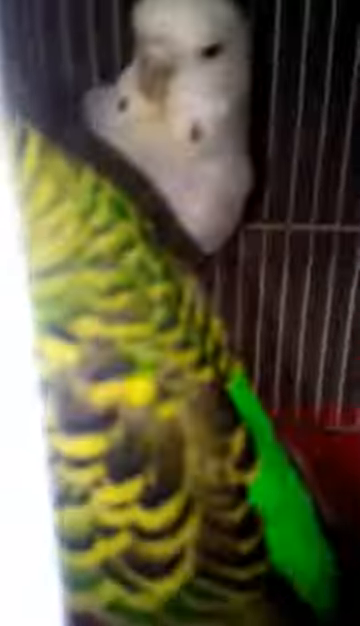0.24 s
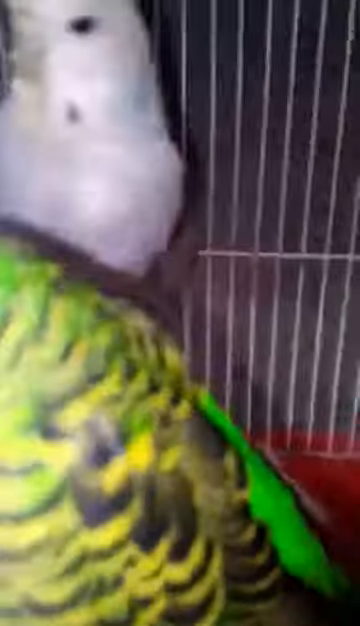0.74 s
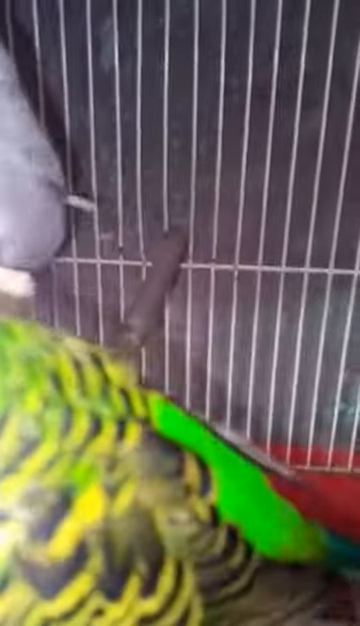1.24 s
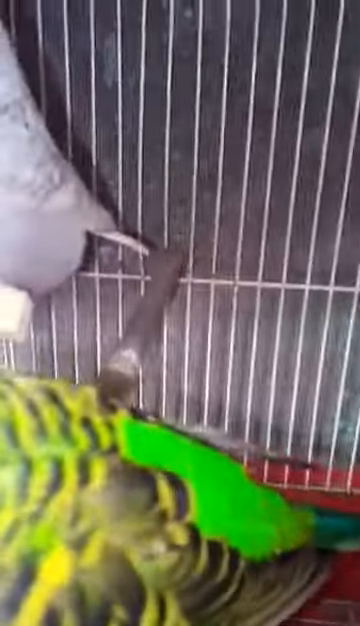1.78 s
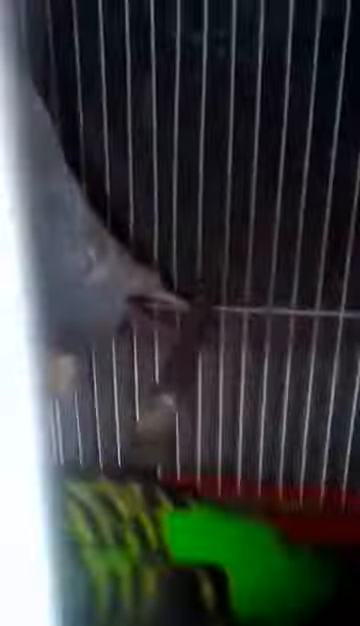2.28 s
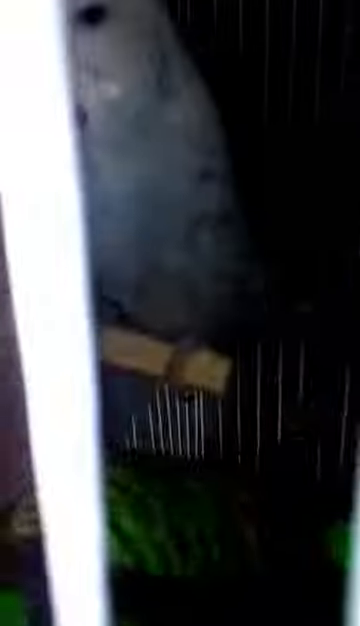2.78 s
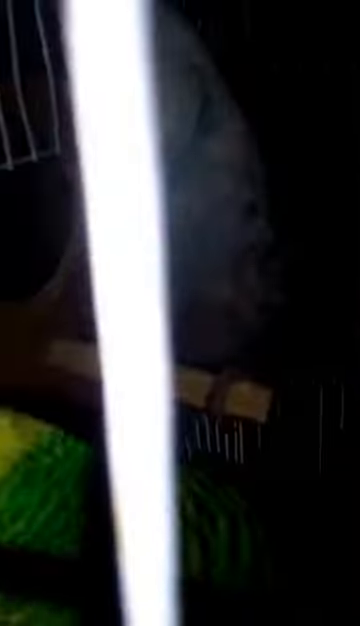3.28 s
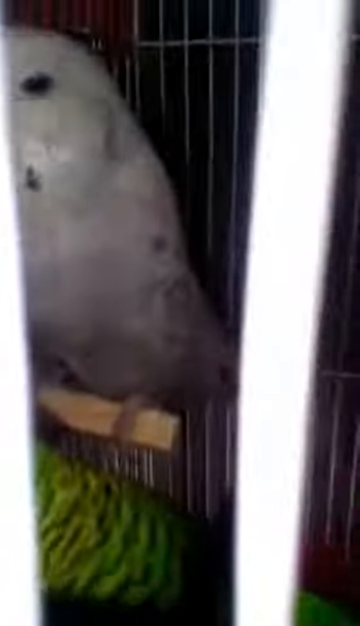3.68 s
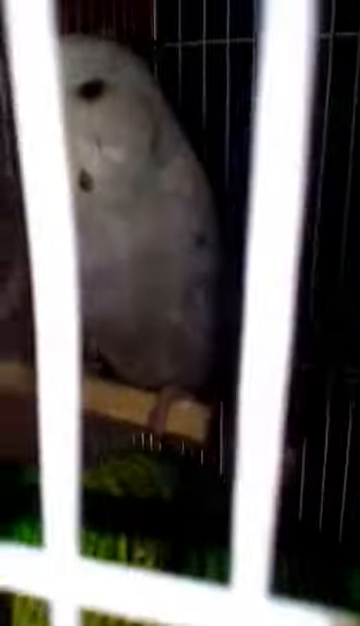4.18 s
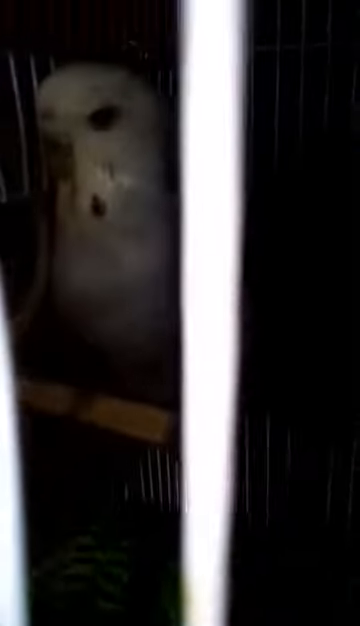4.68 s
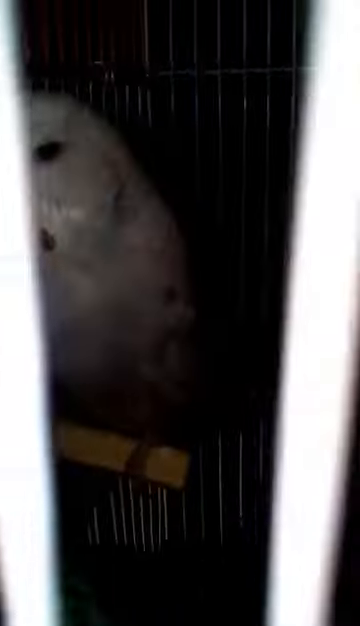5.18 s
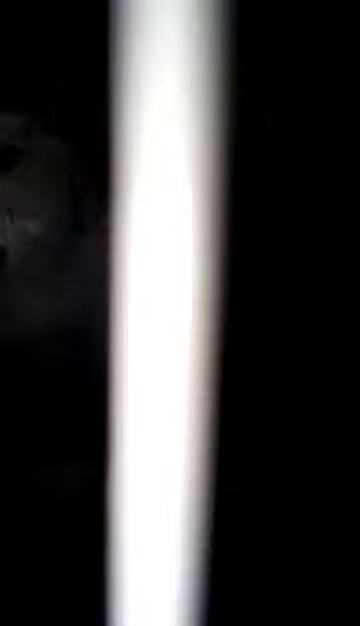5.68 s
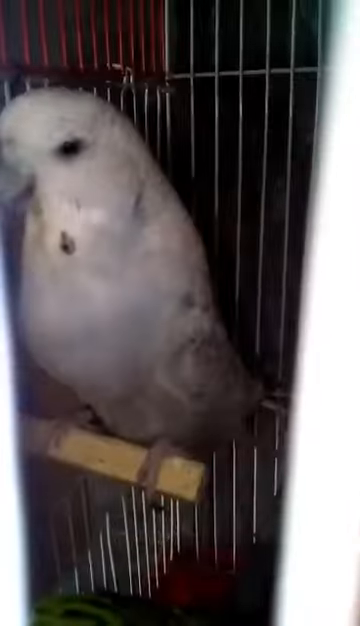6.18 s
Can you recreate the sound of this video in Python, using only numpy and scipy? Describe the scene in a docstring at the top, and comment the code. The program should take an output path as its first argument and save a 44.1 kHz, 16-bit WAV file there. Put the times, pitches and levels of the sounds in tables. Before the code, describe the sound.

Caged budgerigars beg in a bare, reverberant room. Loud fluttering squeaks and hissing rasps come at once with knocks on wood, then in further bursts until nearly three seconds. A quieter stretch holds only rustling bedding, faint squeaks and a knock. Raspy calls return near five seconds, followed by clear close chirps and two small clucks. The close handheld microphone picks up low handling rumbles.

```python
"""Begging budgerigar chicks

Budgerigar chicks beg in bursts of harsh hisses and squeaky notes, in a cage in a bare, echoing room.
Hisses are resonated air puffs; squeaks, peeps and chirps are gliding, fluttering partials.
Birds shuffle in the bedding (grains, ringing walls), knock on the wooden nest box (decaying modes)
and tick on the wires; a few clear chirps and two clucks follow near the end. Low noise rumbles as the
camera is handled, and gain control ducks the background along with the loudest calls."""
import sys
import numpy as np
from scipy import signal
from scipy.fft import rfft, irfft
from scipy.io import wavfile
from scipy.ndimage import uniform_filter1d

SR = 44100
rng = np.random.default_rng(int(sys.argv[2]) if len(sys.argv) > 2 else 0)


def generate_wav(signal):
    """Clip the signal to [-1, 1] and save it as 16-bit WAV at the path in sys.argv[1]."""
    frames = np.transpose(np.atleast_2d(signal))
    scaled = np.clip(frames, -1, 1) * 32767
    pcm = np.round(scaled).astype(np.int16)
    wavfile.write(sys.argv[1], SR, pcm)


N = 284004
TIME = np.arange(N) / SR


def from_db(db):
    """Amplitude ratio: 20 dB is a factor of ten."""
    return 10 ** (np.asarray(db) / 20)


def rms_one(x):
    """Normalisation: scale to unit root-mean-square."""
    return x / np.sqrt(np.mean(x ** 2) + 1e-20)


def add(track, start_s, sound):
    """Superposition: mix a sound into a track at a time."""
    at = max(round(start_s * SR), 0)
    track[at:at + len(sound)] += sound[:max(N - at, 0)]


def noise(size):
    """White noise: independent Gaussian samples."""
    return rng.standard_normal(size)


def low_pass(x, hz):
    """Second-order low-pass filtering."""
    return signal.sosfilt(signal.butter(2, min(hz, .45 * SR), fs=SR, output="sos"), x)


def coloured(x, spectrum):
    """Spectral shaping by a (freq_hz, gain_db) curve, interpolated over log frequency."""
    hz, db = np.transpose(spectrum)
    bins = np.maximum(np.fft.rfftfreq(len(x), 1 / SR), 1)
    gain = from_db(np.interp(np.log(bins), np.log(hz), db))
    return irfft(rfft(x) * gain, len(x))


def wander(size, rate_hz):
    """Random modulation: straight lines between Gaussian values drawn at a given rate."""
    steps = noise(size + 2)
    return np.interp(np.arange(size) * rate_hz / SR, np.arange(size + 2), steps)


def resonance(x, hz, width_hz):
    """Band-pass resonance with steep skirts; unit rms."""
    edges = np.clip([hz - width_hz / 2, hz + width_hz / 2], 100, .45 * SR)
    return rms_one(signal.sosfilt(signal.butter(2, edges, "band", fs=SR, output="sos"), x))


def swell(size, attack, release):
    """Amplitude envelope: rise and fall over these shares of the length."""
    u = np.linspace(0, 1, size)
    return np.sin(np.pi / 2 * np.clip(np.minimum(u / attack, (1 - u) / release), 0, 1))


def movement(rows, rest_db, attack, release):
    """Amplitude modulation: a gain that swells with each movement above a resting level."""
    gain = np.full(N, from_db(rest_db))
    for start_s, length_s, db in rows:
        add(gain, start_s, from_db(db) * swell(int(length_s * SR), attack, release))
    return gain


# background noise spectrum: freq_hz, gain_db
AIR_SPECTRUM = [(25, -16), (70, 9.5), (200, -25), (480, 5.5), (900, 0), (1500, 0), (2500, 2.5),
                (4500, -4.5), (7000, 5), (8500, -48), (14000, -47)]


def air(level_db=-51.5):
    """Stationary coloured noise: the steady background."""
    return from_db(level_db) * rms_one(coloured(noise(N), AIR_SPECTRUM))


def grains(rate_hz, size_db=2.0):
    """Shot noise: randomly timed impulses of random size and sign."""
    sizes = from_db(size_db * np.minimum(rng.exponential(1, N), 4)) * rng.choice([-1, 1], N)
    return sizes * (rng.random(N) < rate_hz / SR)


# birds shuffling in the nest: start_s, length_s, husk_level_db, patter_level_db
SHUFFLE_MOVES = [(0.04, 0.69, -38.5, -49.5), (0.88, 0.56, -55.5, -55), (1.347, 0.41, -43.5, -52),
                 (1.725, 0.61, -40.5, -52.5), (2.61, 0.47, -40.5, -54), (3.264, 0.33, -46, -54.5),
                 (3.539, 0.59, -48, -57), (4.685, 1, -41.5, -59.5), (5.645, 0.59, -51.5, -54.5)]
# spectrum of the crackling husks: freq_hz, gain_db
HUSK_SPECTRUM = [(200, -46), (500, -19.5), (1000, 3.5), (1600, 3), (2600, 9), (4200, 1.5), (6000, 2.5),
                 (7200, 10), (8300, -10.5), (10000, -6.5), (12000, -25), (14000, -22)]


def husks(grains_per_s=2500, clump_db=3.5, clump_rate_hz=45, rest_db=-56):
    """Granular friction: dense clicks of unequal size crackle in clumps."""
    start_s, length_s, husk_db, _ = np.transpose(SHUFFLE_MOVES)
    clumped = grains(grains_per_s) * from_db(clump_db * wander(N, clump_rate_hz))
    gain = movement(zip(start_s, length_s, husk_db), rest_db, attack=0.065, release=0.66)
    return rms_one(coloured(clumped, HUSK_SPECTRUM)) * gain


def ring(clicks, hz, t60_s):
    """Impulse response of a damped mode: a unit click starts a decaying sine of height 1."""
    r, w = from_db(-60 / (t60_s * SR)), 2 * np.pi * hz / SR
    return signal.lfilter([0, np.sin(w)], [1, -2 * r * np.cos(w), r * r], clicks + 1e-18)


# thin wall modes that feet set ringing: freq_hz, level_db
WALL_MODES = [(290, -3.5), (400, 3.5), (455, 3.5), (510, -1), (580, 6.5), (660, 3.5), (820, 7.5), (920, 2),
              (1060, 5.5), (1300, -1), (1520, 3.5), (1800, 2.5)]


def patter(steps_per_s=220, t60_s=0.08, rest_db=-61.5):
    """Modal excitation: each footfall rings one randomly chosen mode of the thin box walls."""
    start_s, length_s, _, patter_db = np.transpose(SHUFFLE_MOVES)
    steps, mode = grains(steps_per_s), rng.integers(0, len(WALL_MODES), N)
    walls = np.zeros(N)
    for k, (hz, db) in enumerate(WALL_MODES):
        walls += from_db(db) * ring(steps * (mode == k), hz, t60_s)
    gain = movement(zip(start_s, length_s, patter_db), rest_db, attack=0.084, release=0.39)
    return rms_one(walls) * gain


# low rumbles as the camera is handled: start_s, length_s, level_db
HANDLING_RUMBLES = [(0.66, 0.18, -47), (0.93, 0.25, -63.5), (1.72, 0.87, -53), (2.68, .32, -45.5),
                    (5.42, 0.25, -41), (5.95, 0.13, -47.5)]
# spectrum of the rumble: freq_hz, gain_db
RUMBLE_SPECTRUM = [(20, -47), (35, 0), (58, 2), (100, 3.5), (200, -7.5), (350, -10.5), (700, -13.5),
                   (2000, -72)]


def handling(lump_db=7.5, lump_rate_hz=30, rest_db=-63.5):
    """Low-frequency handling noise: the handled camera rumbles in uneven lumps."""
    lumps = noise(N) * from_db(lump_db * wander(N, lump_rate_hz))
    gain = movement(HANDLING_RUMBLES, rest_db, attack=0.066, release=0.83)
    return rms_one(coloured(lumps, RUMBLE_SPECTRUM)) * gain


def whistle(length_s, start_hz, end_hz, rough, octave_db, attack,
            flutter_rate_hz=1100, shimmer_db=5.0, third_db=-15, tremble=0.0085):
    """Chaotic frequency modulation: fluttering membranes smear a gliding tone's partials into a screech."""
    size = int((length_s + .004) * SR)  # each note sounds 4 ms longer than listed
    flutter = rough * wander(size, flutter_rate_hz) + tremble * wander(size, 156.8)
    pitch_hz = np.linspace(start_hz, end_hz, size) * (1 + flutter)
    phase = 2 * np.pi * np.cumsum(pitch_hz) / SR
    # the third partial is set relative to the octave, so both grow together
    overtones = np.sin(2 * phase) + from_db(third_db) * np.sin(3 * phase)
    shimmer = rms_one(from_db(shimmer_db * wander(size, 449)))
    pressure = swell(size, attack, 0.23) * shimmer
    return np.sqrt(2) * pressure * (np.sin(phase) + from_db(octave_db) * overtones)


# rough squeaks of the chicks: start_s, length_s, start_hz, end_hz, level_db, roughness (share of pitch)
SQUEAK_NOTES = [(0.002, .065, 2545, 2630, -36.5, 0.19), (0.069, 0.052, 2410, 2750, -27, 0.12),
                (0.091, 0.071, 4016, 3730, -23, 0.019), (0.163, 0.059, 2980, 3600, -9.5, 0.1),
                (0.229, 0.053, 4860, 4710, -26, 0.068), (0.364, 0.11, 4095, 3290, -18.5, 0.071),
                (0.424, 0.058, 2560, 1910, -24.5, .063), (0.486, 0.067, 2960, 3125, -22, 0.08),
                (0.704, 0.11, 2638, 2620, -21.5, 0.088), (0.717, 0.017, 1970, 1864, -28.5, 0.013),
                (0.742, 0.068, 3852, 3985, -10, 0.013), (0.794, 0.059, 3114, 3340, -8, 0.026),
                (0.829, 0.035, 3740, 3642, -9, 0.049), (1.43, 0.045, 2544, 2660, -36, 0.049),
                (1.519, 0.054, 4380, 4500, -25, 0.096), (1.554, 0.068, 2355, 1868, -27.5, 0.28),
                (1.578, 0.044, 3584, 3520, -11.5, 0.056), (1.638, 0.067, 3607, 3650, -11.5, 0.021),
                (3.577, 0.099, 2133, 2520, -39, 0.116), (3.709, 0.037, 2500, 2520, -37.5, 0.072),
                (3.781, 0.069, 2516, 2677, -35.5, 0.058), (3.963, 0.06, 1990, 2053, -42, 0.14),
                (4.016, 0.09, 2268, 2790, -39.5, 0.063), (4.106, 0.13, 2423, 2174, -43, 0.051),
                (4.77, 0.037, 2624, 2330, -28, 0.02), (4.851, 0.032, 2390, 2752, -29.5, 0.04),
                (4.931, 0.058, 2600, 2786, -30.5, 0.069), (4.989, 0.045, 3660, 4040, -25.5, 0.055),
                (5.242, .04, 3680, 3540, -28.5, 0.084)]


def squeaks(octave_db=-13):
    """Nonlinear phonation: each squeak has its own degree of chaotic pitch flutter."""
    out = np.zeros(N)
    for start_s, length_s, start_hz, end_hz, db, rough in SQUEAK_NOTES:
        note = whistle(length_s, start_hz, end_hz, rough, octave_db, attack=0.21)
        add(out, start_s, from_db(db) * note)
    return out


# peeps with a strong octave, some of them the voiced core of a rasp; level is that of the fundamental:
# start_s, length_s, start_hz, end_hz, level_db
PEEP_NOTES = [(0.33, .045, 2525, 3365, -33.5), (1.052, 0.17, 2780, 2720, -56),
              (2.119, 0.044, 3250, 3300, -26), (2.199, 0.075, 3070, 3267, -15),
              (2.444, 0.089, 3042, 3527, -20), (2.561, 0.098, 3042, 2780, -28),
              (3.232, 0.15, 2740, 2656, -51.5), (3.879, 0.046, 2570, 2500, -55),
              (4.396, 0.12, 2480, 2460, -60), (4.954, .05, 2815, 2760, -41.5),
              (5.021, 0.0534, 2896, 3010, -32)]


def peeps(octave_db=13, rough=0.0604):
    """Dominant second harmonic: the octave carries the note above a weaker fundamental."""
    out = np.zeros(N)
    for start_s, length_s, start_hz, end_hz, db in PEEP_NOTES:
        note = whistle(length_s, start_hz, end_hz, rough, octave_db, attack=0.33, third_db=-14)
        add(out, start_s, from_db(db) * note)
    return out


# knocks on the box: start_s, level_db, contact_hz (cut-off; a softer contact is lower)
BOX_KNOCKS = [(0.094, -7.5, 1420), (0.11, -14, 400), (0.244, -18, 162), (0.693, -35.5, 256),
              (1.501, -37.5, 250), (1.734, -38.5, 247), (1.948, -23.5, 198.5), (2.519, -11.5, 85),
              (2.732, -28.5, 190), (3.505, -33, 90), (4.0656, -20.5, 720), (5.451, -21, 326),
              (5.474, -21.5, 200)]
# modes of the box: freq_hz, level_db, t60_s
BOX_MODES = [(67, -30.5, 0.36), (109, -17, 0.085), (199, -13, 0.071), (271, -5.5, 0.036), (390, -16, 0.018),
             (510, 1.5, 0.028), (878, -2.5, 0.026)]


def knocks(rattle_db=-20, rattle_t60_s=0.19):
    """Modal impact: a bump rings the box and shakes what lies in it; soft contact leaves only the thud."""
    out, t = np.zeros(N), TIME[:SR // 3]
    body = np.zeros(len(t))
    for hz, db, t60_s in BOX_MODES:
        body += from_db(db - 60 * t / t60_s) * np.sin(2 * np.pi * hz * t)
    for start_s, db, contact_hz in BOX_KNOCKS:
        rattle = rms_one(low_pass(noise(len(t)), 470)) * from_db(rattle_db - 60 * t / rattle_t60_s)
        add(out, start_s, from_db(db) * low_pass(body + rattle, contact_hz))
    return out


# hissing begging rasps: start_s, length_s, level_db, throat_hz, beak_db (beak resonance)
BEGGING_RASPS = [(0.121, 0.033, -19, 3250, -5), (0.139, 0.032, -24, 3300, 5.5),
                 (0.232, 0.031, -22, 3300, -1), (0.343, 0.082, -21.5, 3650, 1.5),
                 (0.409, 0.21, -24.5, 3300, -7.5), (0.729, 0.072, -30, 3440, -7),
                 (1.328, 0.043, -54, 2790, -0.5), (1.541, 0.077, -21, 3380, -7),
                 (1.596, 0.16, -24, 3377, 3.5), (1.794, 0.03, -23.5, 3500, 8),
                 (1.941, 0.09, -29.5, 2950, 7), (2.048, 0.13, -25.5, 3300, 9),
                 (2.195, 0.15, -24, 3400, 11.5), (2.441, 0.074, -37, 3480, 14.5),
                 (2.55, 0.12, -28, 2980, 16), (2.664, 0.038, -38, 2710, 8), (2.746, .14, -43, 2700, 1.5),
                 (4.691, 0.016, -44, 2560, -5), (4.759, 0.033, -35, 2550, -12),
                 (4.848, 0.029, -34.5, 2540, -1), (4.97, 0.11, -30.5, 2760, -14),
                 (5.04, 0.11, -20, 3200, -6), (5.109, 0.082, -21, 2815, -15),
                 (5.205, 0.044, -29, 2800, -25), (5.384, 0.22, -37.5, 2338, -27),
                 (5.66, 0.051, -42.5, 2290, -25), (5.775, 0.11, -39.5, 3325, -22)]
# the beak resonance at this throat resonance, and the power by which it follows
BEAK_HZ, THROAT_HZ, BEAK_FOLLOWS = 6376, 3300, 0.53


def rasps(pulse_hz=310, pulse_db=3.5, chatter_db=4.0, chatter_rate_hz=130,
          throat_width_hz=1650, beak_width_hz=2400, mouth_hz=4550, mouth_width_hz=1500, mouth_db=-10,
          hiss_db=-7, strand_db=5.5, strand_flutter=0.013):
    """Source and filter: uneven air puffs excite throat, mouth and beak; the syrinx adds wavering tones."""
    out = np.zeros(N)
    for start_s, length_s, db, throat_hz, beak_db in BEGGING_RASPS:
        size = int(length_s * SR)
        beak_hz = BEAK_HZ * (throat_hz / THROAT_HZ) ** BEAK_FOLLOWS
        cycles = np.cumsum(pulse_hz * (1 + 0.4 * wander(size, 307.5))) / SR
        chatter = chatter_db * wander(size, chatter_rate_hz)
        flow = from_db(pulse_db * np.sin(2 * np.pi * cycles) + chatter)
        puffs = noise(size) * flow
        mouth = from_db(mouth_db) * resonance(noise(size) * flow, mouth_hz, mouth_width_hz)
        hiss = from_db(hiss_db) * rms_one(puffs) + mouth
        # the hiss keeps pace with the summed strength of throat and beak
        voice = np.hypot(1, from_db(beak_db)) * hiss
        for hz, width_hz, gain_db in ((throat_hz, throat_width_hz, 0), (beak_hz, beak_width_hz, beak_db)):
            flutter_hz = hz * strand_flutter * wander(size, 963)
            pitch_hz = hz + flutter_hz + 0.3 * width_hz * wander(size, 150)
            strand = rms_one(np.sin(2 * np.pi * np.cumsum(pitch_hz) / SR) * flow)
            formant = resonance(puffs, hz, width_hz)
            voice = voice + from_db(gain_db) * rms_one(formant + from_db(strand_db) * strand)
        add(out, start_s, from_db(db) * swell(size, 0.2, 0.31) * voice)
    return out


# claws and beaks ticking on the wires: start_s, level_db
WIRE_TICKS = [(2.832, -26), (3.974, -35.5), (4.797, -25.5), (4.963, -32), (5.485, -30), (6.051, -50),
              (6.219, -44)]


def ticks(tick_hz=6000, width_hz=3000, t60_s=0.062):
    """Exponential decay: short bright taps of band-limited noise."""
    out, t = np.zeros(N), TIME[:SR // 20]
    for start_s, db in WIRE_TICKS:
        tap = resonance(noise(len(t)), tick_hz, width_hz)
        add(out, start_s, from_db(db - 60 * t / t60_s) * tap)
    return out


# clear chirps of a bird close by: start_s, length_s, start_hz, end_hz, level_db
CHIRP_NOTES = [(5.294, 0.045, 2837, 3025, -14.5), (5.339, 0.018, 2563, 2190, -20.5),
               (5.371, 0.016, 2370, 1480, -24.5), (5.464, .015, 3155, 3050, -29.5),
               (5.53, 0.018, 2814, 2540, -27), (5.552, 0.018, 2840, 2930, -15),
               (5.787, 0.0029, 3220, 2360, -29.5), (5.822, .007, 3020, 3180, -25.5),
               (5.839, 0.017, 2084, 1650, -34), (5.866, 0.036, 2675, 3000, -24),
               (5.903, 0.027, 3300, 3540, -29)]


def chirps(octave_db=-23.5, rough=0.042):
    """Frequency glide: quick notes, nearly pure because their overtones are weak."""
    out = np.zeros(N)
    for start_s, length_s, start_hz, end_hz, db in CHIRP_NOTES:
        note = whistle(length_s, start_hz, end_hz, rough, octave_db, attack=0.13)
        add(out, start_s, from_db(db) * note)
    return out


# short clucks: start_s, pitch_hz, level_db
CLUCK_NOTES = [(6.17, 1128, -27), (6.371, 1346, -32)]


def clucks(throat_hz=1300, width_hz=3400, t60_s=0.088, rough=0.035, count=5,
           click_db=-1, click_t60_s=0.021, click_hz=3100, click_width_hz=2200):
    """Harmonic series under a formant: a beak click and a dying pop whose lower partials are favoured."""
    out, t, k = np.zeros(N), TIME[:SR // 10], np.arange(1, count + 1)
    for start_s, pitch_hz, db in CLUCK_NOTES:
        phase = 2 * np.pi * np.cumsum(pitch_hz * (1 + rough * wander(len(t), 900))) / SR
        partial_gain = 1 / (1 + (2 * (k * pitch_hz - throat_hz) / width_hz) ** 2)
        stack = partial_gain @ np.sin(np.outer(k, phase))
        pop = from_db(-60 * t / t60_s) * rms_one(stack)
        click = resonance(noise(len(t)), click_hz, click_width_hz)
        click = from_db(click_db - 60 * t / click_t60_s) * click
        add(out, start_s, from_db(db) * (pop + click))
    return out


def room(x, t60_s=0.41, treble_t60_s=0.3, damping_hz=4500, onset_s=0.0053):
    """Diffuse reverberation: dense reflections from hard walls; the treble dies first."""
    t, echoes = TIME[:SR], noise(SR)
    dull = coloured(echoes, [(damping_hz / 2, 0), (damping_hz, -3), (2 * damping_hz, -20)])
    tail = dull * from_db(-60 * t / t60_s) + (echoes - dull) * from_db(-60 * t / treble_t60_s)
    tail = tail * np.clip(t / onset_s - .5, 0, 1)  # fades in, half open at onset_s
    return signal.fftconvolve(x, tail / np.sqrt(np.sum(tail ** 2)))[:N]


# how the calls carry out of the box: freq_hz, gain_db
CARRY_SPECTRUM = [(400, -99), (1100, -15), (1900, -0.5), (3200, -3), (6500, -3), (7600, -4), (8500, -14),
                  (9700, -11.5), (12000, -23.5), (14000, -27)]


def scene(call_room_db=-2, near_room_db=-14, chirp_room_db=-7):
    """Direct and reverberant sound: calls fill the room; chirps, box, bedding and handling are close."""
    near = husks() + patter() + handling() + knocks()
    calls = coloured(squeaks() + peeps() + rasps() + ticks() + clucks(), CARRY_SPECTRUM)
    close = coloured(chirps(), CARRY_SPECTRUM)
    sent = from_db(call_room_db) * calls + from_db(chirp_room_db) * close + from_db(near_room_db) * near
    mix = calls + close + near + air() + room(sent)
    # the small microphone loses the deepest bass
    return signal.sosfilt(signal.butter(4, 44, "high", fs=SR, output="sos"), mix)[None]


def record(dry, threshold_db=-23, squeeze=0.66, release_db_per_s=140, cutoff_hz=14100):
    """Dynamic range compression: gain drops for loud calls and recovers quickly; the top is cut."""
    power = uniform_filter1d(dry[0] ** 2, size=500)
    level_db = 10 * np.log10(np.maximum(power, 1e-12))
    # peaks are held, then fall at the release rate
    fall_db = release_db_per_s * TIME
    held_db = np.maximum.accumulate(level_db + fall_db) - fall_db
    excess_db = uniform_filter1d(np.maximum(held_db - threshold_db, 0), size=200)
    gain = from_db(-squeeze * excess_db)
    return signal.sosfilt(signal.ellip(10, .1, 80, cutoff_hz, fs=SR, output="sos"), dry * gain)


dry = scene()
out = record(dry)
generate_wav(out)
```